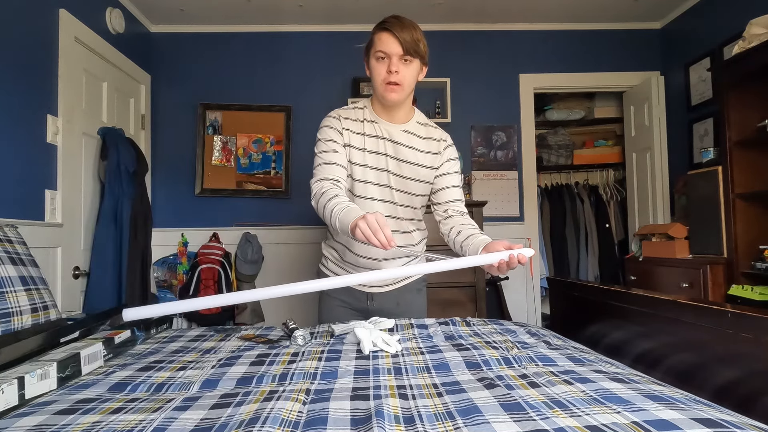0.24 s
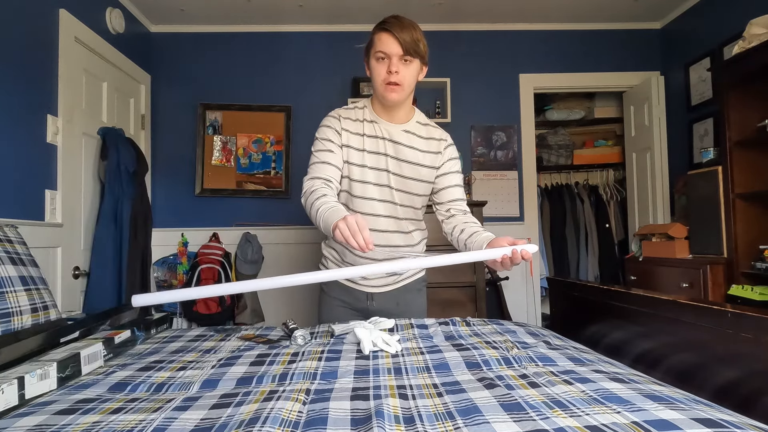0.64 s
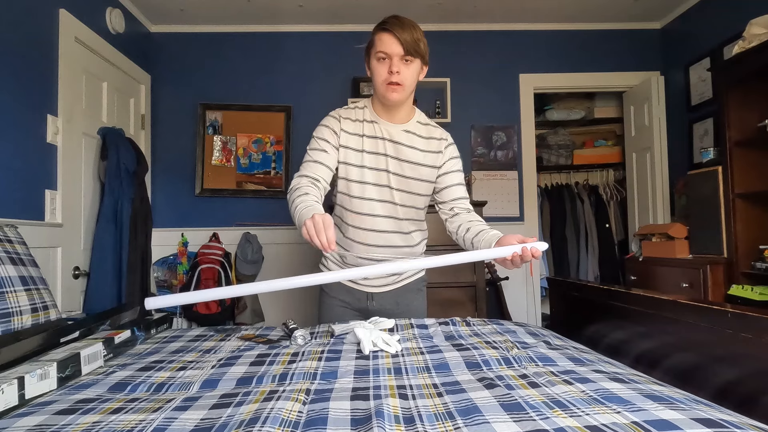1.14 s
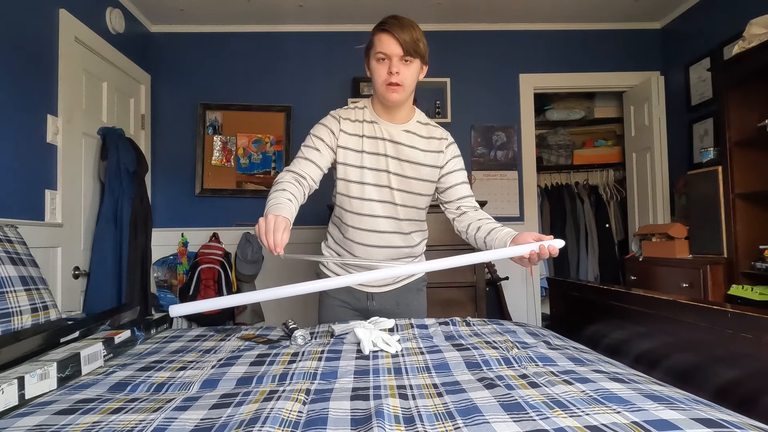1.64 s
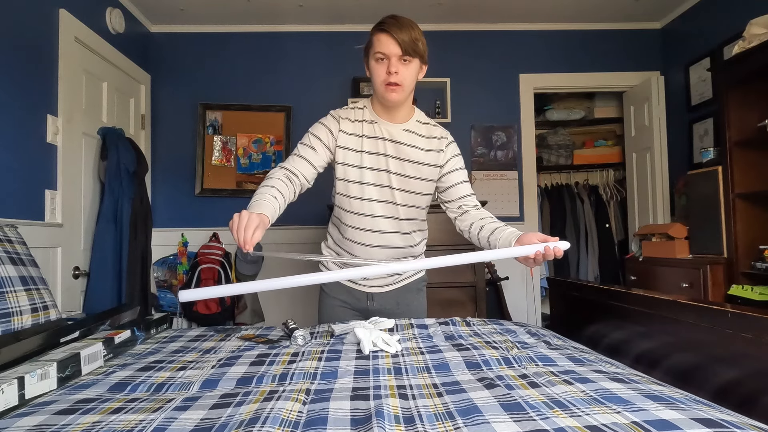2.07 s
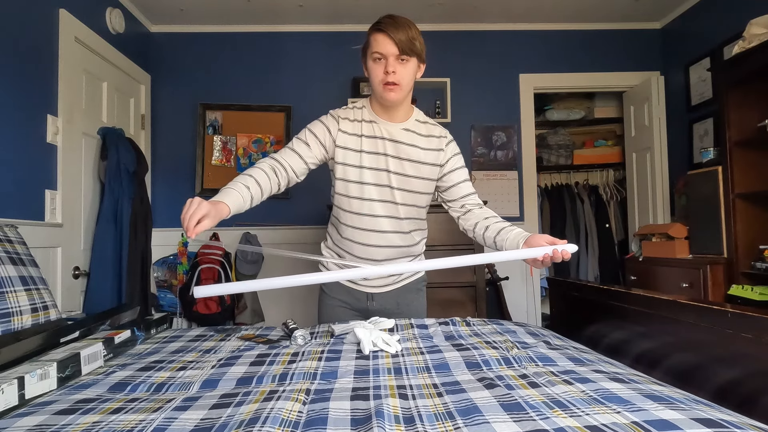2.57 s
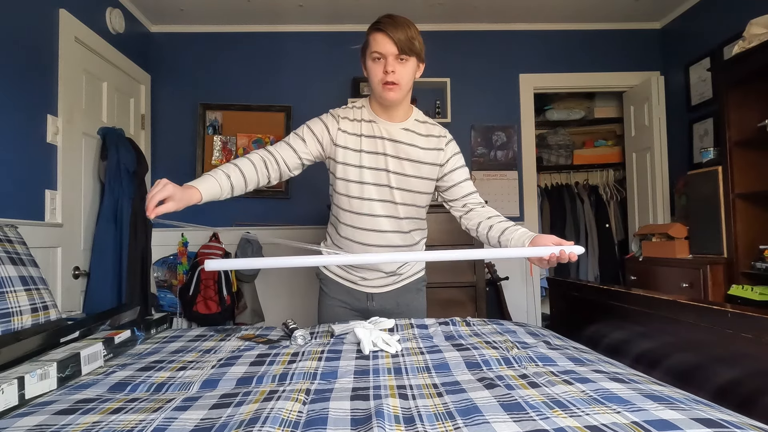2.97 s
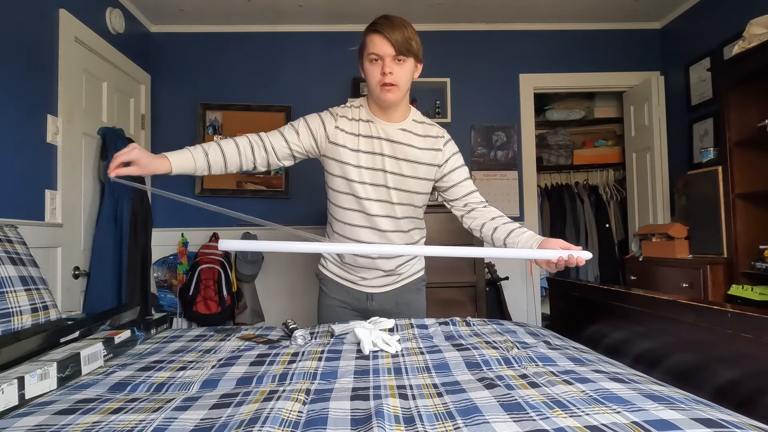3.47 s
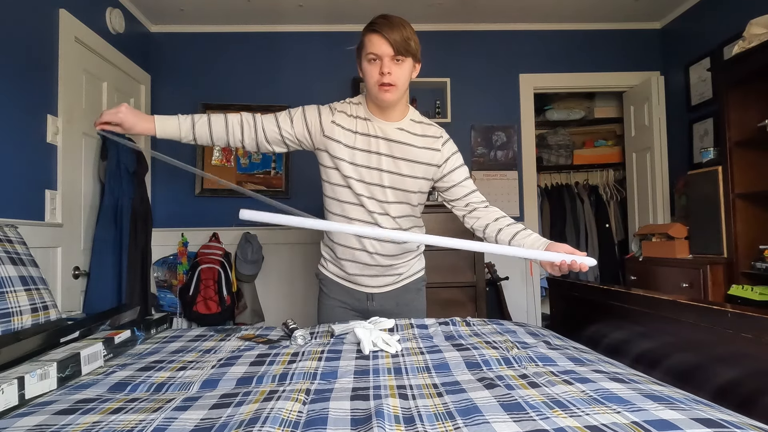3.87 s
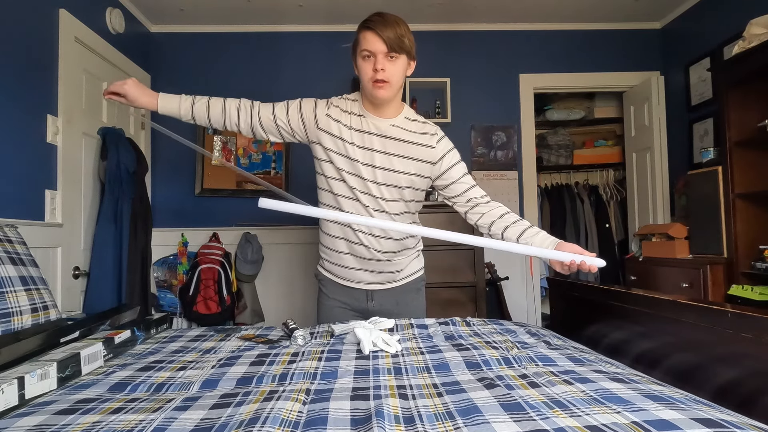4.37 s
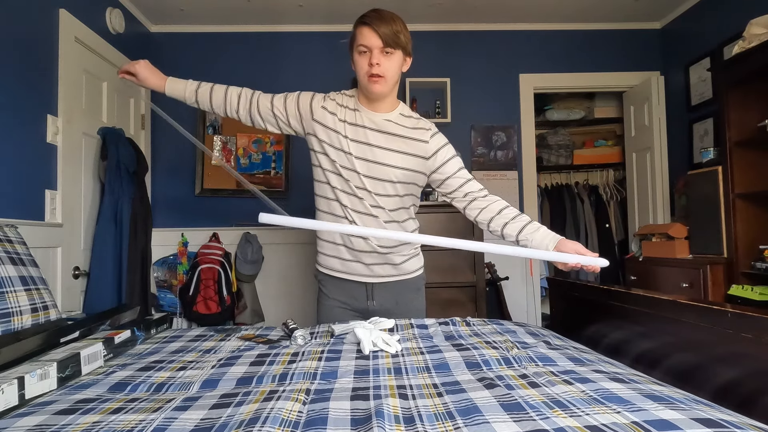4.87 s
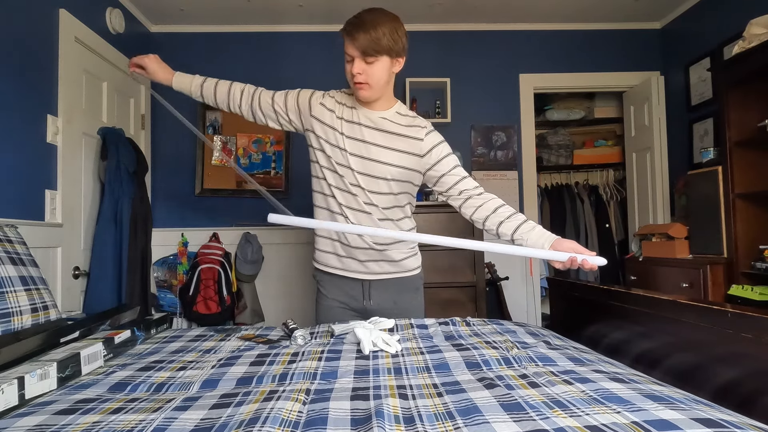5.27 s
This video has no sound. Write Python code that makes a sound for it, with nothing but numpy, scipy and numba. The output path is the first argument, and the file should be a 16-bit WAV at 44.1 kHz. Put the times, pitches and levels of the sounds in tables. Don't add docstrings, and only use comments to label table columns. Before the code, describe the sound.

A long, jerky, crisp crackle of protective film pulled from a hard tube, surging and easing, then stopping with lone ticks and last tugs.

```python
import sys
import numpy as np
from scipy import signal
from scipy.fft import rfft, irfft, next_fast_len
from scipy.io import wavfile
from scipy.ndimage import uniform_filter1d
from numba import njit

SR = 44100
rng = np.random.default_rng(int(sys.argv[2]) if len(sys.argv) > 2 else 0)


def to_wav(s):
    ch = np.atleast_2d(s).T
    pcm = np.round(np.clip(ch, -1, 1) * 32767)
    wavfile.write(sys.argv[1], SR, pcm.astype(np.int16))


N = 243255
HZ = np.maximum(np.fft.rfftfreq(next_fast_len(N + SR), 1 / SR), 1)


def undb(db):
    return 10 ** (np.asarray(db) / 20)


def unit(x):
    return x / np.sqrt(np.mean(x ** 2))


def curves(table):
    s, *columns = np.transpose(table)
    return [np.interp(np.arange(N) / SR, s, c) for c in columns]


def pitch(shakes):
    return curves(np.array(shakes)[:, [0, 3]])[0]


def swells(s, half_s, db, rest_db):
    t = np.arange(N) / SR
    power = sum(undb(2 * d) * np.exp(-((t - c) / h) ** 2) for c, h, d in zip(s, half_s, db))
    return 10 * np.log10(power + undb(2 * rest_db))


def walk(rate):
    hold = int(SR / rate)
    steps = np.repeat(rng.standard_normal(N // hold + 1), hold)
    return unit(uniform_filter1d(uniform_filter1d(steps, hold), hold)[:N])


def shape(points):
    hz, db = np.transpose(points)
    return undb(np.interp(np.log(HZ), np.log(hz), db))


def band(lo_hz, hi_hz):
    return 1 / np.sqrt((1 + (lo_hz / HZ) ** 8) * (1 + (HZ / hi_hz) ** 8))


def colour(x, gain):
    size = 2 * len(HZ) - 2
    return irfft(rfft(x, size) * gain, size)[..., :N]


@njit
def resonate(x, hz, width):
    y, b, l = np.empty(len(x)), 0., 0.
    for i in range(len(x)):
        g, k = np.tan(np.pi * hz[i] / SR), width / hz[i]
        v = (b + g * (x[i] - l)) / (1 + g * (g + k))
        b, l, y[i] = 2 * v - b, l + 2 * g * v, k * v
    return y


def crackle(rate, scatter_db):
    when, sign, size = rng.random(N), rng.standard_normal(N), rng.exponential(size=N)
    clicks = (when < rate / SR) / np.sqrt(rate) * np.sign(sign)
    return unit(clicks * undb(scatter_db * np.minimum(size, 4)))


# (frequency [Hz], level [dB per Hz])
SNAP_COLOUR = [(600, -35), (950, -29), (1400, -19), (2200, -14), (3400, -11), (4150, -7), (4900, -1.5),
               (6700, -4), (7700, -7.5), (8300, -12.5), (9800, -13.5), (10500, -9), (13600, -20),
               (14600, -30)]
JERK_DB, SPLIT_HZ = 0.98, 5900


def peel():
    lower_db, upper_db, fine_db, body_db = effort()
    hiss_db = (lower_db + upper_db) / 2
    pace_hz = pitch(LOW_SHAKES) * (1 + .12 * walk(30))
    swing = np.sqrt(2) * np.sin(2 * np.pi * np.cumsum(pace_hz) / SR)
    jerks = undb(JERK_DB * swing + 0.88 * walk(300) + 1.54 * walk(40))
    jerks = jerks / np.sqrt(uniform_filter1d(jerks ** 2, size=2000))
    rate = 10000 * np.clip(undb(hiss_db + 58), .12, 1)
    snaps = colour(crackle(rate, scatter_db=2.0) * jerks, shape(SNAP_COLOUR))
    hiss = unit(colour(snaps, band(4480, 7580)))
    lower = colour(hiss, 1 / (1 + (HZ / SPLIT_HZ) ** 8))
    hiss = lower * undb(lower_db) + (hiss - lower) * undb(upper_db)
    fine = unit(colour(snaps, band(9930, 16300))) * undb(fine_db + 0.57 * walk(45))
    body = unit(colour(snaps, band(670, 3816))) * undb(body_db + 1.1 * walk(13))
    return undb(-3.5) * (hiss + fine + body)


# (time [s], peel level [dB], crispness of the fold [dB], tautness: upper over lower hiss [dB])
PULL = [(0.0, -37.5, -14, -0.5), (0.58, -39.5, -10.5, -7), (0.735, -54.5, -7, 1), (0.8, -62, 1, 3),
        (0.84, -44, -12, 3), (0.93, -40, -11, 3.5), (1.23, -46, 0, -1), (1.33, -59, 3, 13),
        (1.39, -61, 13, 10.5), (1.63, -43.5, -9, 0.5), (2.7, -43, -7.5, 2), (3.0, -45, -10, -0.5),
        (4.28, -48.5, -9, 5), (4.58, -33.5, -6.5, 0), (4.81, -45.5, -13, 2), (5.0, -50, -13, 6.5),
        (5.07, -69.5, -14, 1), (5.3, -90, -14, 2)]
# (time [s], level against the hiss [dB])
TUBE = [
    (0, -18),
    (1.6, -14),
    (3.0, -12),
    (4.5, -8.5),
    (5.0, -12),
    (5.3, -36),
]
# (time [s], level [dB], build-up [s], hold [s], weight on the tube [dB])
TUGS = [(0.009, -40, 0.029, .05, -23), (0.123, -39.5, 0.023, 0.014, -31),
        (0.56, -43.5, 0.069, 0.077, -12.5), (0.744, -50.5, 0.013, 0.0077, -13),
        (1.118, -47.5, .03, 0.086, -17), (1.489, -52.5, 0.055, 0.016, -8), (1.813, -45.5, .03, 0.092, -12),
        (2.123, -47.5, 0.044, 0.022, -20), (2.785, -42, 0.014, 0.051, -12),
        (2.887, -39.5, 0.057, 0.026, -11.5), (3.12, -51.5, 0.11, 0.036, -7),
        (3.367, -37.5, .07, 0.052, -15.5), (3.451, -36, .02, 0.012, -20), (3.53, -38, 0.035, 0.025, -8),
        (3.867, -38.5, 0.12, 0.069, -5), (3.95, -31.5, 0.014, 0.086, -9), (4.126, -41.5, 0.057, 0.0069, -8),
        (4.22, -39, 0.014, 0.011, -10), (4.322, -45, 0.022, 0.18, -6.5), (4.826, -44, 0.016, 0.023, 2),
        (4.92, -42.5, 0.022, 0.022, -3.5), (5.357, -52, .012, 0.0077, -17),
        (5.384, -48.5, 0.024, 0.0065, -1.5), (5.51, -46.5, 0.013, .02, -8)]
# (time [s], level [dB], build-up [s], hold [s], weight on the tube [dB])
STRAGGLERS = [
    (5.102, -66.5, 0.011, .005, -25),
    (5.166, -70, 0.009, 0.004, -18),
    (5.207, -68, 0.011, .005, -20),
    (5.345, -73, 0.037, .005, -1),
]
BUILD_DB, RELEASE_DB_PER_S = 21.5, 262
TUG_CRISP_DB, TUG_TAUT_DB = -9.5, -1
CRISP_LOSS = 0.25
STALL_DB, STALL_SHARE = -44.5, 0.86


def effort():
    t = np.arange(N) / SR
    pull_db, crisp_db, taut_db = curves(PULL)
    tube_db = curves(TUBE)[0] + STALL_SHARE * np.clip(STALL_DB - pull_db, 0, 12)
    power = undb(2 * (pull_db + np.array([-taut_db / 2, taut_db / 2, crisp_db, tube_db])))
    for s, db, build_s, hold_s, weight_db in TUGS + STRAGGLERS:
        build_up_db = BUILD_DB * np.maximum(s - t, 0) / build_s
        release_db = RELEASE_DB_PER_S * np.maximum(t - s - hold_s, 0)
        tug_db = db - build_up_db - release_db
        fine_db = TUG_CRISP_DB - CRISP_LOSS * np.clip(db + 39.5, -12, 12)
        balance_db = np.array([[-TUG_TAUT_DB / 2], [TUG_TAUT_DB / 2], [fine_db], [weight_db]])
        power = power + undb(2 * tug_db) * undb(2 * balance_db)
    return 10 * np.log10(power)


# (time [s], peak level [dB], ring [Hz])
SNAPS = [(0.039, -28, 5000), (0.2317, -32, 6060), (0.306, -30, 5180), (0.334, -27, 5200),
         (0.374, -27.5, 5260), (0.495, -27, 5630), (0.5454, -23.5, 4780), (0.7436, -38, 5360),
         (0.924, -29, 6300), (2.844, -26, 5100), (2.8977, -33, 4780), (2.9115, -25, 4860),
         (3.3633, -28, 4955), (3.382, -26, 4850), (3.4506, -24, 4200), (3.4555, -22.5, 4550),
         (3.467, -25, 4840), (3.5305, -29, 4620), (3.862, -26, 5360), (3.87, -29, 5130),
         (3.9012, -24, 5350), (3.9465, -22, 4930), (3.9545, -16, 5100), (3.966, -22, 5300),
         (4.3151, -35, 5200), (4.5157, -24, 5240), (4.6216, -28, 5290), (4.8365, -29, 5140),
         (4.8534, -27, 5100), (4.969, -27.5, 5040)]
# (time [s], peak level [dB], ring [Hz])
TICKS = [(5.0864, -59, 5050), (5.1023, -54, 5400), (5.1627, -63, 5760), (5.1664, -56, 5200),
         (5.1764, -65, 5300), (5.2066, -54, 5550), (5.2244, -58, 5980), (5.3318, -64, 5200),
         (5.349, -55, 5240), (5.3582, -41, 5360), (5.3892, -38, 4940), (5.3942, -38, 5420),
         (5.5084, -40, 5640)]


def big_snaps():
    rings, grits, t = np.zeros(N + 400), np.zeros(N + 400), np.arange(400) / SR
    grit = rng.standard_normal((len(SNAPS + TICKS), 400))
    burst = (1 - np.exp(-t / 0.00023)) * np.exp(-t / 0.0013) * 1.44
    for (s, db, hz), g in zip(SNAPS + TICKS, grit):
        start = int(s * SR)
        rings[start:start + len(t)] += undb(db) * np.sin(2 * np.pi * hz * t) * burst
        grits[start:start + len(t)] += undb(db) * g * burst
    return undb(-2.5) * rings[:N] + undb(-4.5) * colour(grits[:N], shape(SNAP_COLOUR) ** 0.75)


# (time [s], half length [s], level [dB], pitch [Hz])
LOW_SHAKES = [(0.054, 0.089, -78, 185), (0.312, .1, -78, 178), (0.552, 0.15, -74, 171),
              (1.19, 0.12, -67.5, 182), (1.626, 0.055, -63, 196), (2.284, 0.057, -63, 188),
              (2.56, 0.17, -59.5, 180), (2.83, 0.16, -59, 172), (2.99, 0.073, -67, 168),
              (3.17, 0.047, -60, 160), (3.55, 0.15, -61.5, 158), (3.66, .06, -60, 158.1),
              (3.799, 0.099, -58, 160.1), (4.19, 0.069, -60.5, 190), (4.604, 0.17, -74, 160),
              (4.935, 0.086, -62, 184), (5.15, 0.085, -69.5, 179), (5.4, 0.1, -64.5, 188)]
# (time [s], half length [s], level [dB], pitch [Hz], overtones against it [dB])
HIGH_SHAKES = [(0.076, 0.13, -79, 239, -2), (0.296, 0.098, -71.5, 245, -1), (0.53, .1, -76.5, 243, 4),
               (0.98, 0.043, -76, 255, 1), (1.27, 0.065, -70.5, 275, 4), (1.417, 0.098, -63.5, 283, -12),
               (1.642, 0.045, -58, 236, -17), (1.795, 0.095, -63, 258, -26), (2.01, 0.13, -57.5, 257, -13),
               (2.247, 0.1, -67, 244, -15), (2.515, 0.2, -67, 232, -2), (2.802, 0.069, -62, 254, -0.5),
               (3.0, 0.12, -59, 253, -9.5), (3.194, 0.13, -60, 265, -11), (3.505, 0.14, -60.5, 241, -2.5),
               (3.733, 0.046, -58, 274, -3.5), (3.886, 0.044, -59.5, 248, 1),
               (4.03, 0.032, -63.5, 253, -3.5), (4.185, 0.064, -70, 244, 7.5),
               (4.326, 0.072, -56.5, 277, -4), (4.833, 0.075, -59.5, 252, 0.5), (4.932, 0.052, -61, 257, 2),
               (5.387, 0.028, -64, 257, -1)]
# (low mode [dB], upper mode [dB], overtones [dB])
REST_DB = (-73, -83, -77)
SLACK_S, SLACK_DB = 5.04, -22


def strip():
    low_hz, high_hz = pitch(LOW_SHAKES), pitch(HIGH_SHAKES)
    slack_db = SLACK_DB * np.clip((np.arange(N) / SR - SLACK_S) / 0.042, 0, 1)
    low_rest_db, high_rest_db, over_rest_db = (db + slack_db for db in REST_DB)
    s, half_s, db, _ = np.transpose(LOW_SHAKES)
    low_db = swells(s, half_s, db, low_rest_db)
    s, half_s, db, _, bright_db = np.transpose(HIGH_SHAKES)
    high_db = swells(s, half_s, db, high_rest_db)
    over_db = swells(s, half_s, db + bright_db, over_rest_db)
    low = unit(resonate(resonate(crackle(1500, scatter_db=3), low_hz, 31.0), low_hz, 70.))
    high = unit(resonate(resonate(crackle(1500, scatter_db=4), high_hz, 75.0), high_hz, 170.0))
    flutter = crackle(3000, scatter_db=2.5) * undb(2.14 * walk(24.94))
    cloud = unit(colour(flutter, band(273, 640) * 300 / HZ))
    return undb(low_db) * low + undb(high_db) * high + undb(over_db + 1.5) * cloud


# (length [s], level [dB], low edge [Hz], high edge [Hz])
RUB = (-0.05, -71.5, 420, 2000)
RUB_S = 5.315


def rub():
    length, db, lo_hz, hi_hz = RUB
    swell = np.exp(-.5 * ((np.arange(N) / SR - RUB_S) / length) ** 2)
    return undb(db) * swell * unit(colour(rng.standard_normal(N), band(lo_hz, hi_hz) / HZ))


# (time [s], half length [s], level [dB])
RUMBLES = [
    (0.27, 0.12, -63.5),
    (0.975, 0.19, -67.5),
    (1.46, 0.18, -72),
    (1.86, .12, -59),
    (2.137, 0.065, -62.5),
    (3.519, .08, -70),
    (4.02, 0.056, -69),
    (4.323, 0.099, -72),
    (4.9, 0.083, -66.5),
]
# (time [s], half length [s], level [dB])
THUDS = [(0.17, 0.044, -69), (0.51, .08, -73), (1.02, .06, -71), (1.46, .05, -74), (2.16, .1, -74),
         (2.867, .1, -51.5), (3.15, 0.14, -56), (3.5, .03, -61), (3.794, .09, -55), (4.17, 0.049, -66.5),
         (4.687, 0.13, -56), (4.897, 0.14, -61), (5.216, 0.057, -55), (5.416, .06, -57.5)]
# (frequency [Hz], level [dB])
MAINS = [(59.2, -75.5), (118.4, -74)]
# (frequency [Hz], level [dB per Hz])
HUSH = [(300, 6.5), (800, -19.5), (2000, -14), (4000, -13), (6000, -43), (10000, -58), (15000, -36)]
HUSH_DB, QUIET_RUMBLE_DB, QUIET_THUD_DB = -77, -79.5, -77


def house():
    rumble_db = swells(*np.transpose(RUMBLES), QUIET_RUMBLE_DB)
    thud_db = swells(*np.transpose(THUDS), QUIET_THUD_DB)
    rumble = unit(colour(rng.standard_normal(N), band(39, 160)))
    thud = unit(colour(rng.standard_normal(N), band(14, 21) ** 2 + .09 * band(21, 50)))
    hush = unit(colour(rng.standard_normal((2, N)), shape(HUSH) * band(290, 15000)))
    hum = sum(undb(db + 1.5) * np.sin(2 * np.pi * hz * np.arange(N) / SR) for hz, db in MAINS)
    hum = hum * undb(np.minimum(rumble_db + 68, 0) / 2)
    low_end = hum + undb(rumble_db - 3.0) * rumble + undb(thud_db - 1.0) * thud
    return low_end, undb(HUSH_DB) * hush


# (frequency [Hz], left minus right [dB])
LEFT_BIAS = [(60, 0), (110, -2.5), (200, -1), (380, -0.5), (700, 2), (1290, -5.5), (2380, 3), (4400, 0),
             (8120, 2.5), (15000, 7.5)]
# (frequency [Hz], room against direct [dB])
DIFFUSE = [(25, -13), (60, -10), (150, -2), (300, -15.5), (700, 1), (1300, -2.5), (3000, -1), (5500, -3.5),
           (9000, -1.5), (12500, 0)]
ROOM_T60_S = 0.12
PLACES = 28


def room(x):
    t = np.arange(SR // 4) / SR
    fade = np.exp(-np.log(1000) * t / ROOM_T60_S) * (t > .002)
    tails = rng.standard_normal((PLACES + 1, 2, len(t))) * fade / np.sqrt(np.sum(fade ** 2))
    hop = N // PLACES + 1
    near = np.sin(np.pi * np.arange(2 * hop) / (2 * hop))
    padded, wet = np.pad(x, (hop, 2 * hop)), np.zeros((2, N + 3 * hop + len(t)))
    for k, tail in enumerate(tails):
        passing = padded[k * hop:(k + 2) * hop] * near
        echo = signal.fftconvolve(tail, passing[None], axes=1)
        wet[:, k * hop:k * hop + echo.shape[1]] += echo
    bias = np.sqrt(shape(LEFT_BIAS))
    return colour(x + colour(wet[:, hop:hop + N], shape(DIFFUSE)), np.array([bias, 1 / bias]))


def scene():
    low_end, hush = house()
    return room(peel() + big_snaps() + strip() + rub() + low_end) + hush


def roll_off(x):
    return signal.sosfilt(signal.butter(12, 15780, fs=SR, output="sos"), x)


def record(dry):
    return roll_off(dry)


dry = scene()
out = record(dry)
to_wav(out)
```